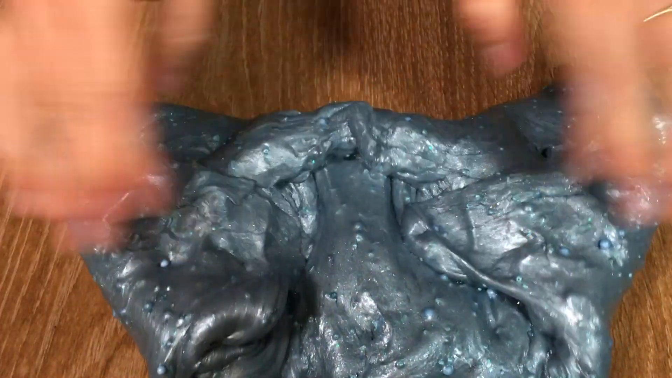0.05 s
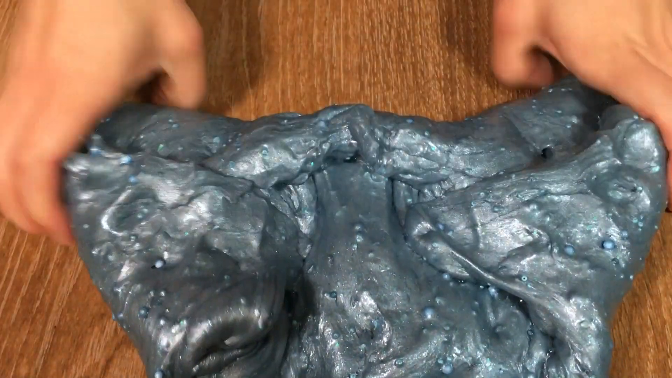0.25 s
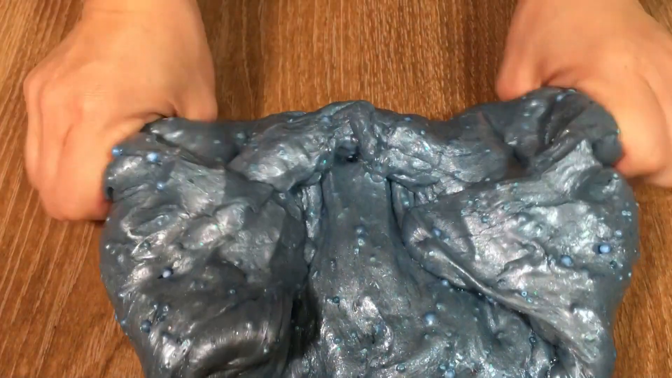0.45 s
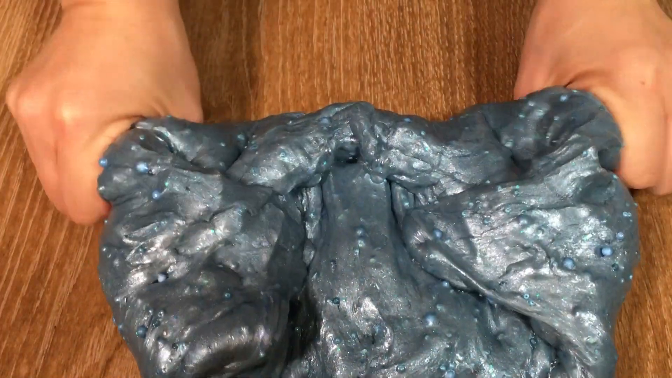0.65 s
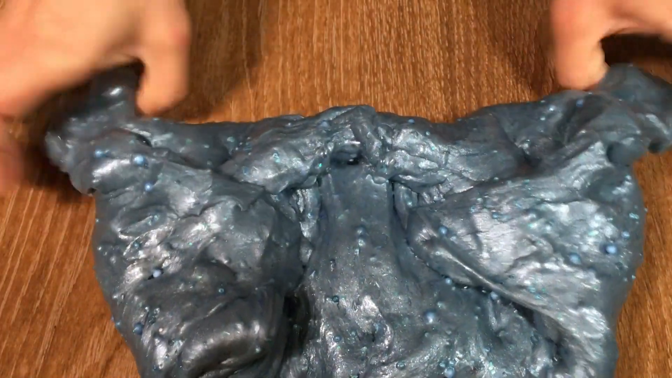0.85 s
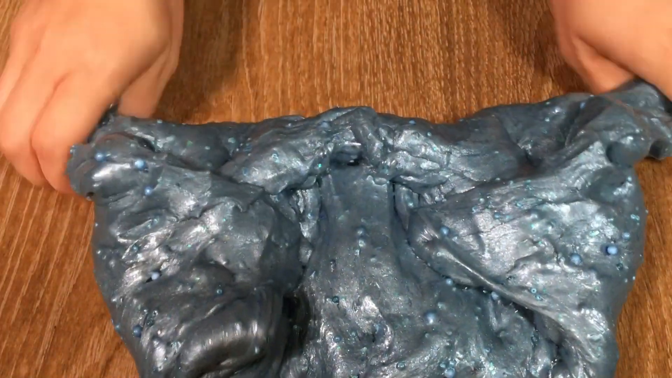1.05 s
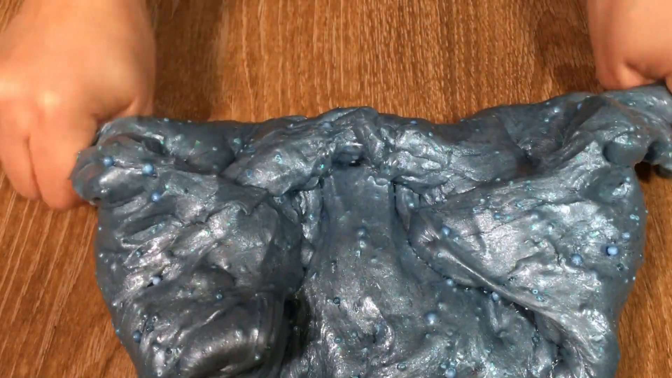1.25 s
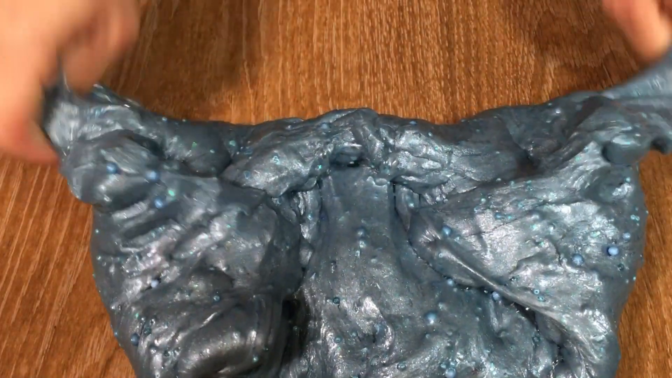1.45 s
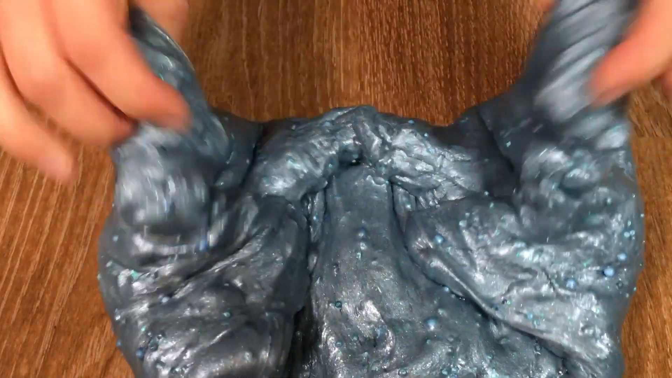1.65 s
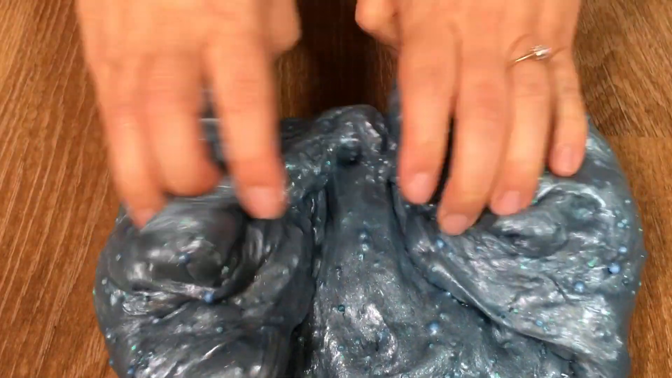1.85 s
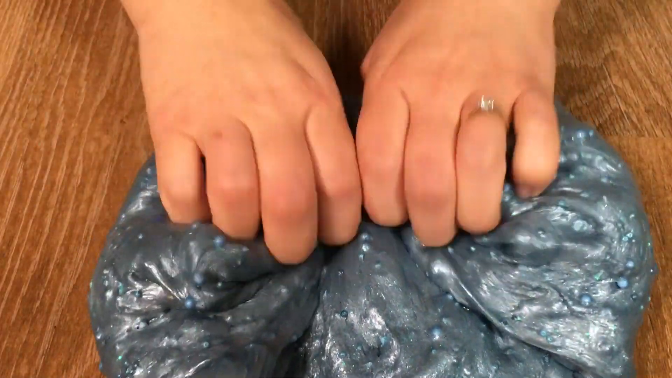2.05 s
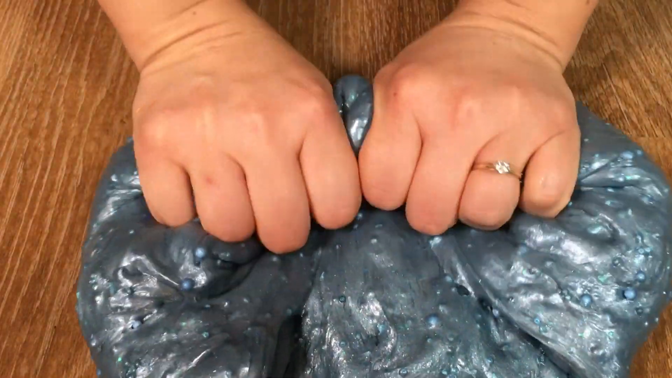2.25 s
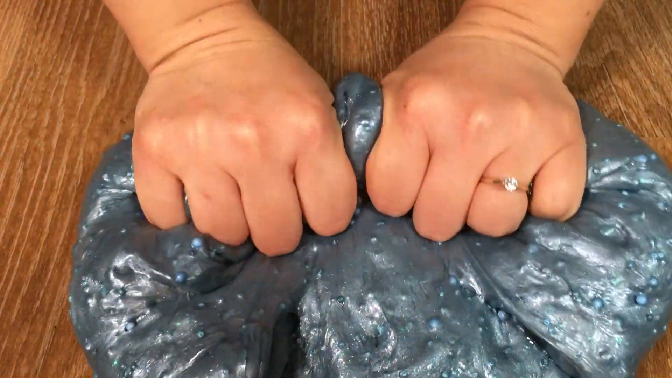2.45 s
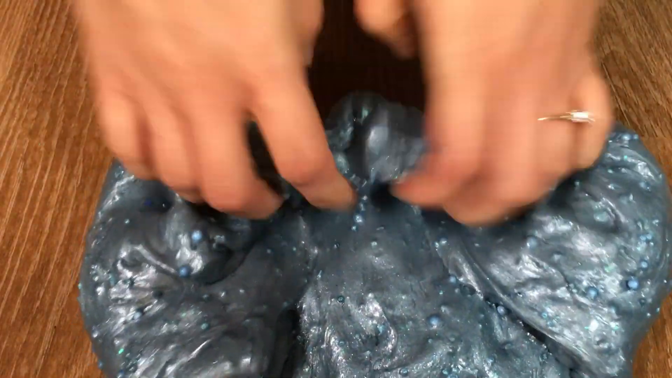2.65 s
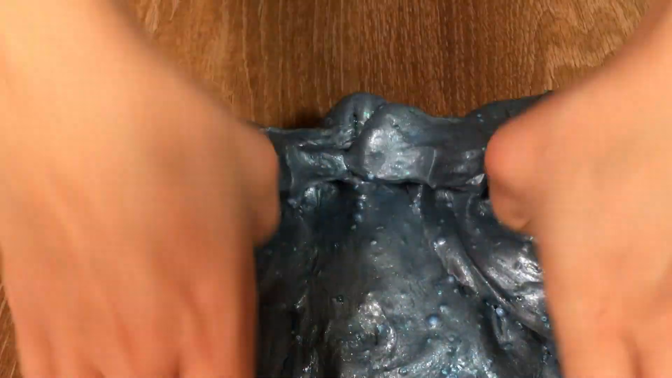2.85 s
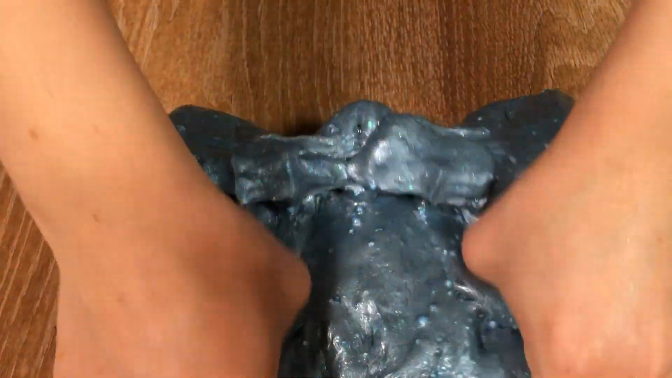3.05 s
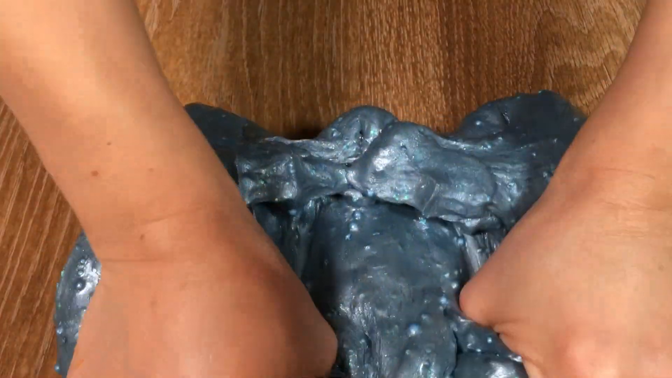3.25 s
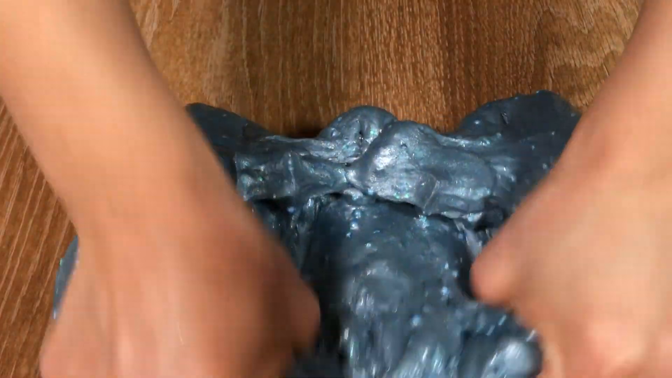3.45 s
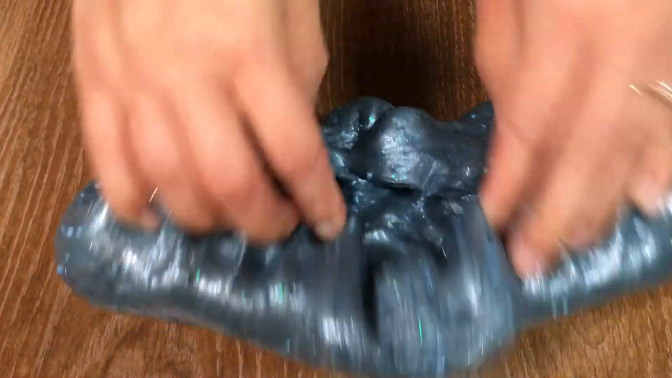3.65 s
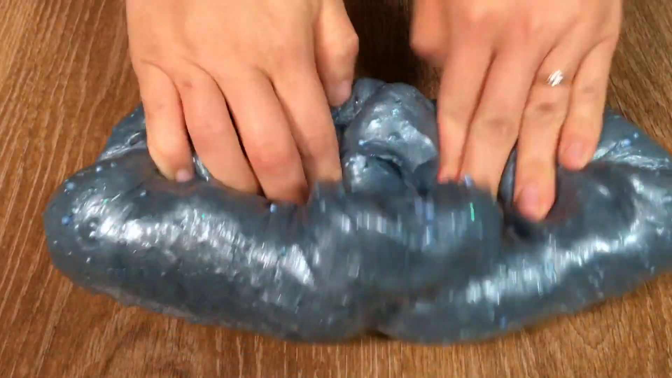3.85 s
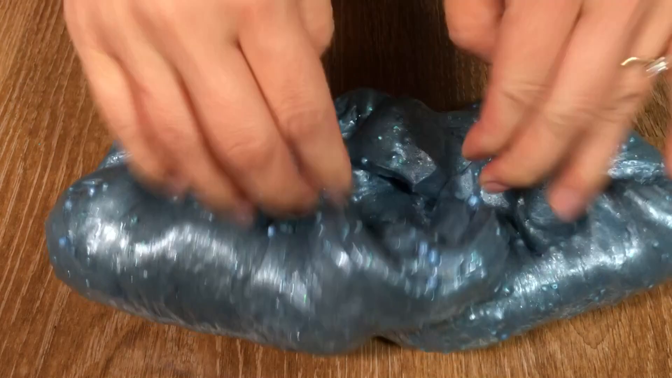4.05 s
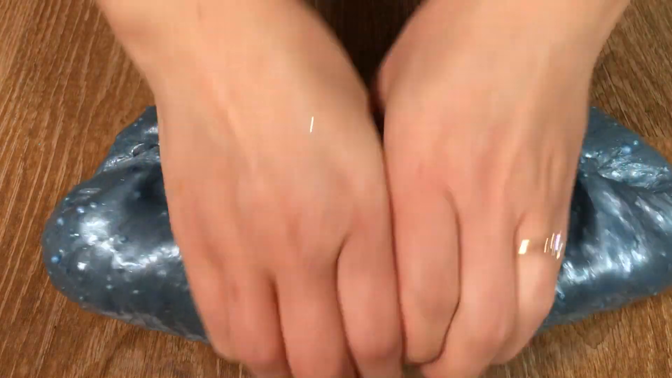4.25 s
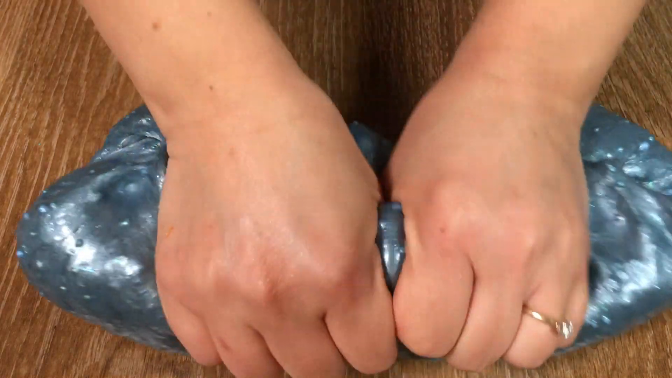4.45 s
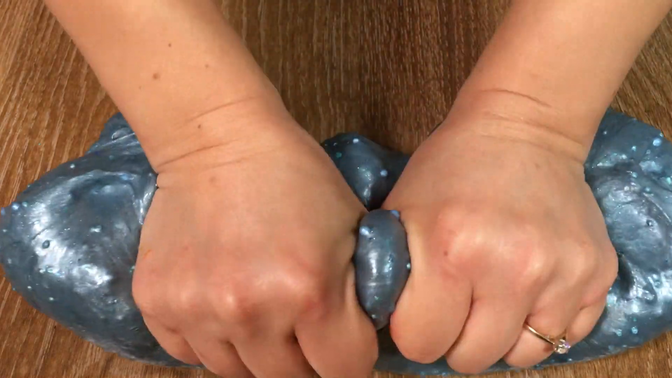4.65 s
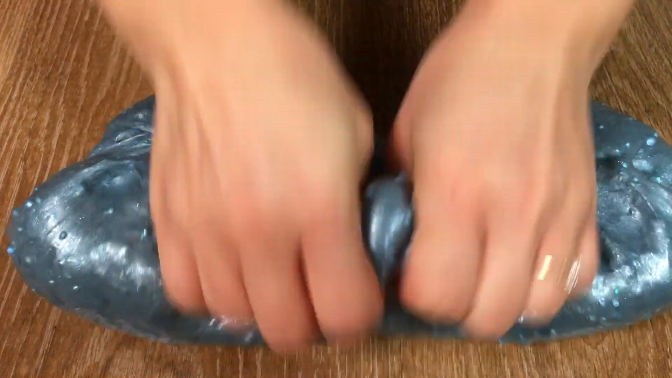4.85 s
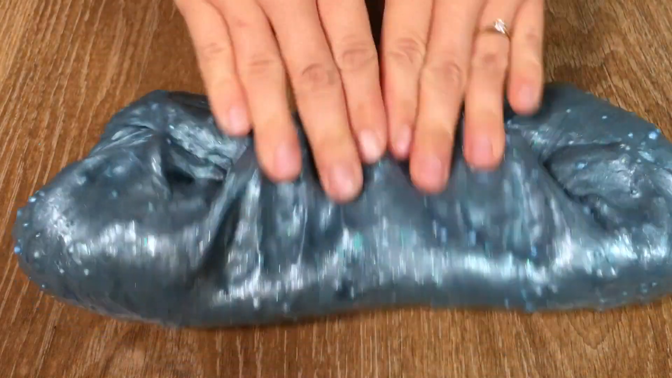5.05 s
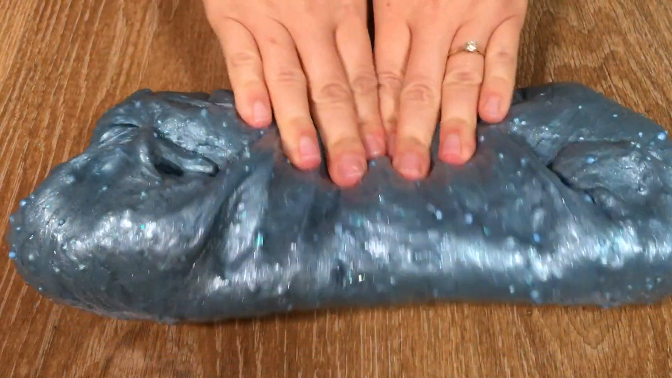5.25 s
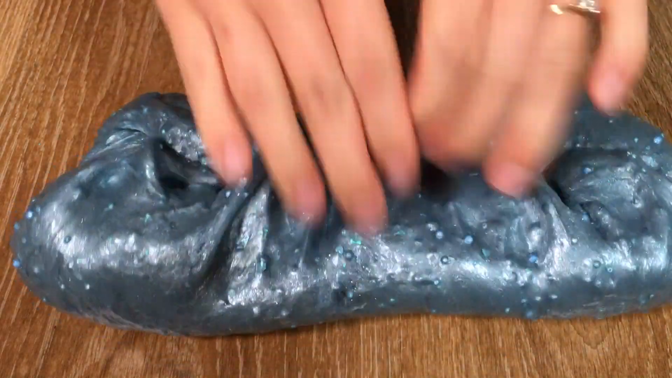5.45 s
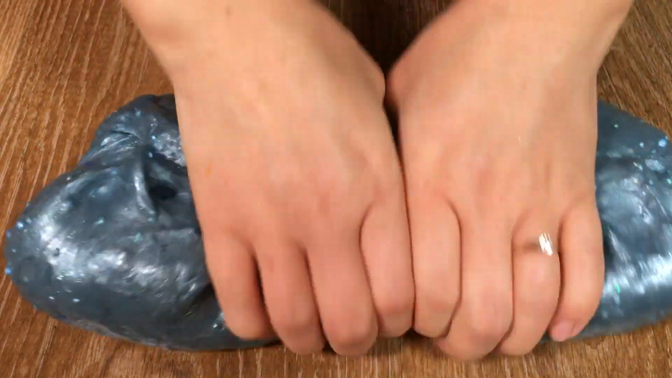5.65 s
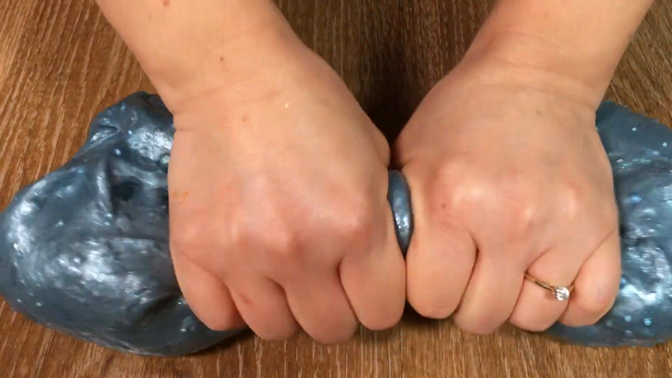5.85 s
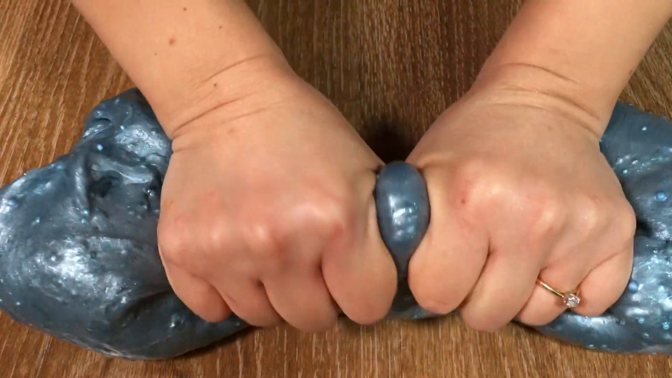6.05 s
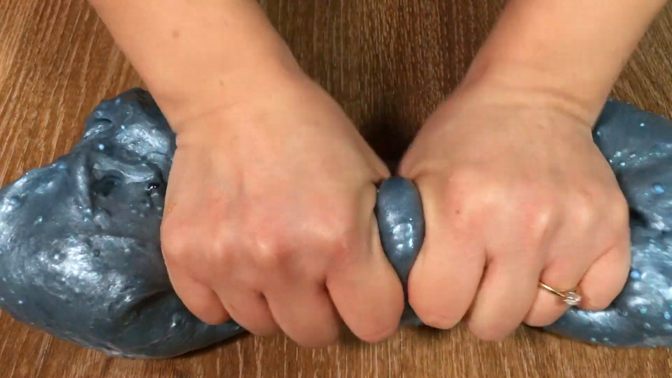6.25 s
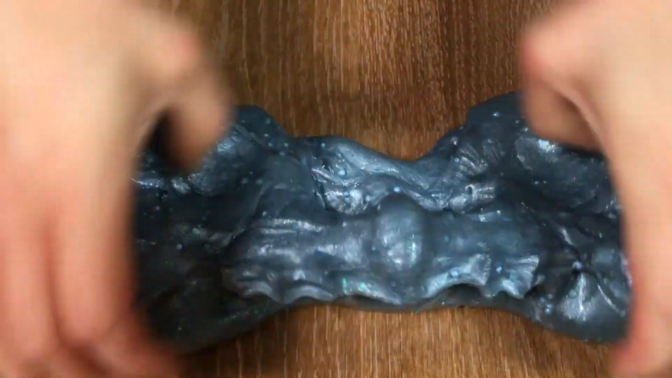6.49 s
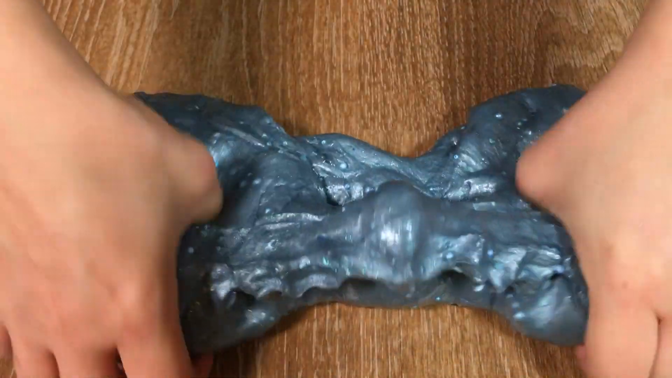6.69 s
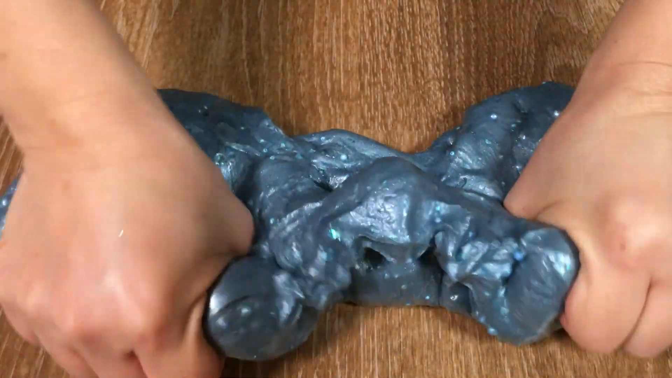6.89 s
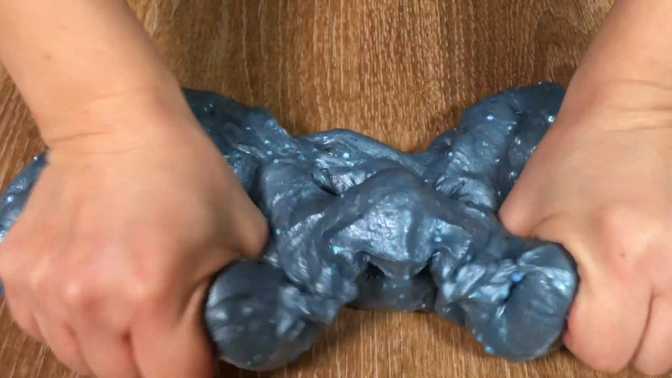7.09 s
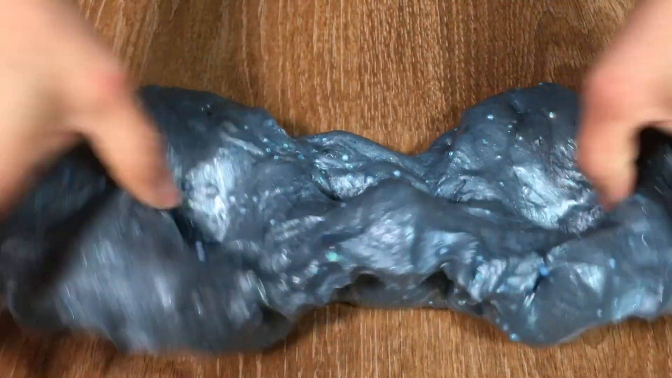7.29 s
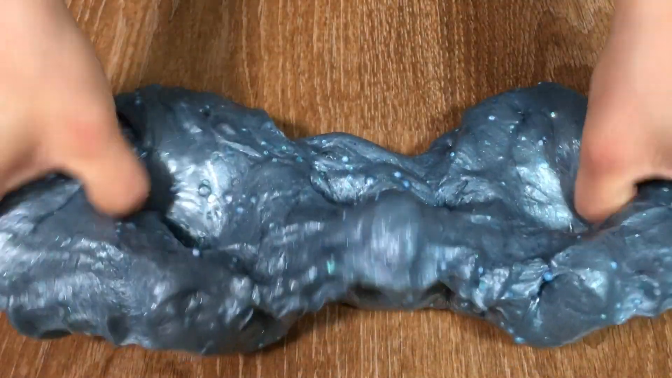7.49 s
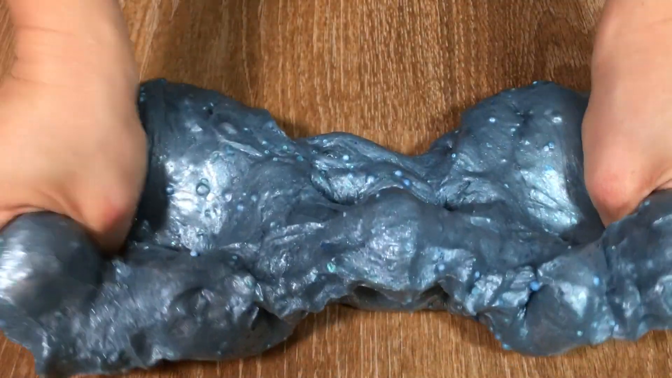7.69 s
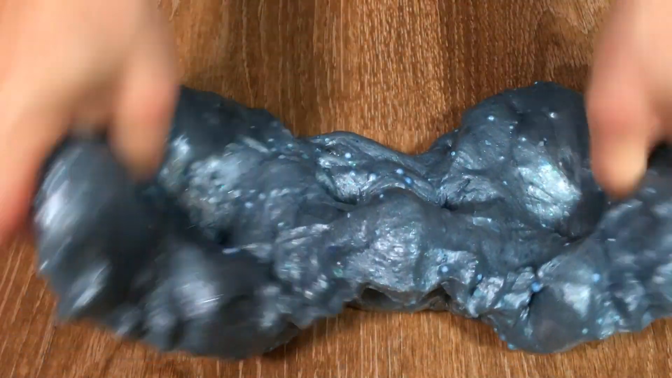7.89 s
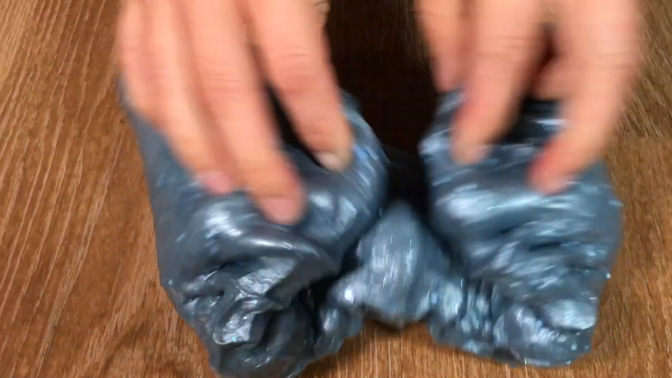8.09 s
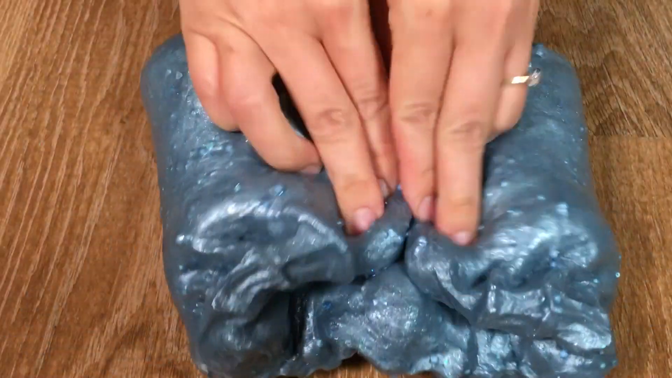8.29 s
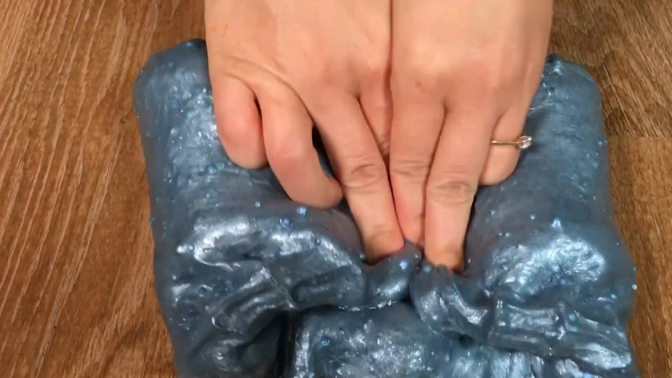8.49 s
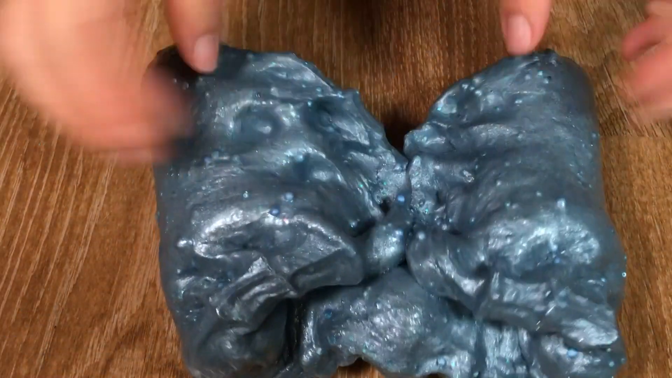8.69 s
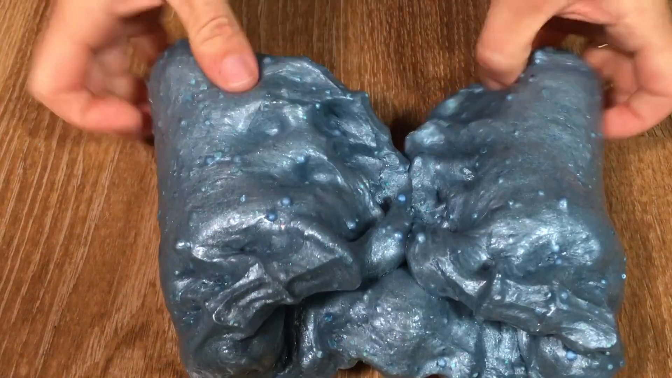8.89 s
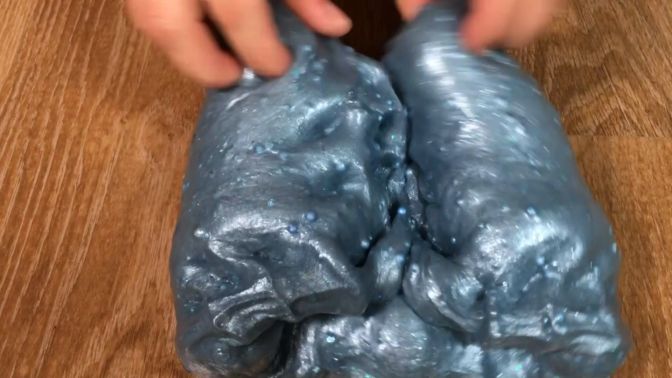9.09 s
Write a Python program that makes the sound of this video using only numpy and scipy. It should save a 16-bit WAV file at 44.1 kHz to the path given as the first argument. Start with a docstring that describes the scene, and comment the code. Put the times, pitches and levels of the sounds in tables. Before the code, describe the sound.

Very close to the microphone, hands stretch and fold thick slime on a wooden table in a quiet furnished room. Short sticky swishes alternate with flurries of sharp bubble pops, fine crackle and soft squelches. Big air pockets bark just after one second and again midway. Later a burst of air hits the microphone with an overloaded bass thump, then the background briefly dips and the handling becomes gentler.

```python
"""Two hands knead a lump of sticky slime on a wooden table, close to a microphone in a quiet room.
Over hum, rumble and hiss, noise bursts swish as the slime peels off, and the lump drags in dull swells.
Soft squelches sag in pitch, resonant pulses pop as small bubbles burst, and random ticks crackle under the squeeze.
After a second, large air pockets bark; late on, one burst blows straight at the microphone:
a diving sine thumps and overloads it, then the background dips for a moment."""
import sys
import numpy as np
from scipy import signal
from scipy.fft import rfft, irfft, next_fast_len
from scipy.io import wavfile
from scipy.ndimage import uniform_filter1d

SR = 44100
rng = np.random.default_rng(int(sys.argv[2]) if len(sys.argv) > 2 else 0)


def waveform_to_disk(signal):
    """Save audio, clipped to [-1, 1], as 16-bit WAV at the path in sys.argv[1]."""
    frames = np.transpose(np.atleast_2d(signal))
    scaled = np.clip(frames, -1, 1) * 32767
    samples = np.round(scaled).astype(np.int16)
    wavfile.write(sys.argv[1], SR, samples)


N = 402633
TIME = np.arange(N) / SR  # s

# A distant appliance hums. Each row: frequency in Hz, rms level in dB ahead of the dip.
HUM = [(49.5, -63), (120, -63), (127, -69.5)]
# Spectrum of room rumble and hiss. Each row: frequency in Hz, relative level in dB.
FLOOR_COLOUR = [(20, -32.5), (44, 0.5), (65, 2), (100, -3.5), (200, 0.5), (320, -11), (700, -16),
                (2000, -23.5), (16000, -33.5)]
# The background dips after the thump. Each row: time in seconds, gain in dB.
FLOOR_DIP = [(6.17, 0), (6.25, -14), (6.55, -13), (7.2, 0)]

# The hands let go and the slime peels off in a quick swish.
# Each row: start in seconds, hold in seconds, level in dB ahead of the body and fizz trims,
# treble in dB relative to that level.
PEELS = [(.022, 0.022, -38, -1), (.79, 0.083, -41.5, -1.5), (1.5, 0.063, -48, 3),
         (1.858, 0.0074, -44.5, -14), (2.66, 0.098, -39, -1), (3.52, 0.12, -39, -1), (4.057, 0.031, -42, 1),
         (4.895, 0.091, -35.5, -4.5), (5.422, 0.029, -45.5, 1.5), (6.39, 0.073, -45, -3),
         (7.23, 0.084, -37, -2), (7.92, 0.09, -39.5, -1.5), (8.637, 0.018, -37.5, -2)]
PEEL_RISE_DB_PER_S, PEEL_FALL_DB_PER_S = 423, 420.5
# The hands press or stretch the lump and it fizzes faintly.
# Each row: start in seconds, hold in seconds, grip in dB (drives the crackle, and the swish after trims),
# treble in dB relative to the grip.
SQUEEZES = [(.56, .06, -39.5, 4), (.98, 0.54, -61, -3.5), (1.62, 0.088, -55, -3.5),
            (1.77, 0.056, -60.5, 12), (2.06, 0.012, -54.5, -10.5), (2.22, 0.065, -47.5, -2),
            (2.34, 0.097, -61.5, -24), (2.59, 0.049, -49.5, 1), (3.03, .14, -55, -3.5),
            (3.26, 0.059, -43, -7), (3.76, 0.033, -55, -2), (4.31, 0.15, -64, -3.5), (4.59, 0.12, -52, -2),
            (5.06, 0.16, -62.5, 2.5), (5.82, 0.051, -56, -5.5), (6, 0.073, -44.5, -1.5),
            (6.88, 0.11, -55, -18), (7.42, 0.46, -57.5, -4), (8.07, 0.036, -53, 6.5), (8.41, .03, -59, -9),
            (9.03, 0.053, -53, -1)]
SQUEEZE_RISE_DB_PER_S, SQUEEZE_FALL_DB_PER_S = 158.5, 149
# Spectrum of the swish's body. Each row: frequency in Hz, relative level in dB.
PEEL_BODY = [(80, -6), (200, -2), (600, -0.5), (900, -0.5), (1400, 2.5), (2200, 0), (3300, -2),
             (4600, -7.5), (7000, -26.5), (16000, -50.5)]
# Spectrum of the swish's treble fizz. Each row: frequency in Hz, relative level in dB.
PEEL_FIZZ = [(500, -42.5), (3000, -13.5), (5000, -3.5), (6500, 2), (9500, 1.5), (10800, -3.5), (13000, -2),
             (16000, -13.5)]

# How long each band of the room rings. Each row: frequency in Hz, time to fall 60 dB in seconds.
ROOM_T60 = [(200, .35), (700, .46), (1800, .43), (5000, .33), (10000, .29), (16000, .19)]
# Spectrum of the reverberation as it starts. Each row: frequency in Hz, relative level in dB.
ROOM_COLOUR = [(100, 1.5), (600, -3), (1600, -3.5), (4500, -3), (9000, 0), (16000, 7.5)]

# The lump shifts on the table as the hands let go.
# Each row: swell centre in seconds, peak level in dB, half length (Gaussian sigma) in seconds.
SHIFTS = [(0.05, -49, 0.02), (2.672, -48, 0.027), (4.087, -41, 0.021), (4.879, -41.5, 0.01),
          (7.262, -49, 0.053), (8.647, -35, 0.012)]
# Spectrum of that drag. Each row: frequency in Hz, relative level in dB.
SHIFT_COLOUR = [(50, -22), (125, -6), (170, 0), (255, -1), (380, -13), (1000, -38)]

# Soft squelches under the fingers.
# Each row: start in seconds, level in dB (rms of the ring at full swell), ring midway through its sag in Hz.
SQUELCHES = [(.274, -44.5, 530), (.302, -41.5, 740), (.325, -42, 550), (.947, -42.5, 540),
             (0.985, -32.5, 512), (2.944, -44.5, 480), (2.975, -42, 715), (3.379, -41.5, 509),
             (4.367, -38.5, 1330), (5.277, -43.5, 571), (5.702, -41.5, 649), (6.143, -29.5, 309),
             (6.391, -34.5, 663), (6.547, -49, 150), (6.62, -49, 341.6), (6.64, -38.5, 543),
             (7.029, -41.5, 720), (7.441, -37.5, 573), (7.81, -43.5, 840), (7.851, -40.5, 887),
             (8.134, -42, 730), (8.288, -43.5, 392), (8.854, -46.5, 620)]
# weaker bubbles trail each squelch: latest delay, relative level, pitch scatter (-0.5 to +1.5 times this)
TRAIL_S, TRAIL_DB, TRAIL_OCTAVES = 0.023, -13, 0.92

# The clearest small bubbles bursting.
# Each row: time in seconds, level in dB over 1 ms ahead of scatter, ring in Hz, sharpness (no unit).
POPS = [(0.4339, -28.5, 3200, 0.93), (0.465, -34, 5000, .3), (0.4875, -28, 14000, 1.8),
        (0.5042, -19.5, 11900, 0.24), (.527, -12.5, 4770, 0.95), (0.5546, -11.5, 3920, 6),
        (0.574, -16, 4180, 0.49), (0.576, -7.5, 5360, 1), (0.5614, -26, 9000, .5),
        (0.598, -18.5, 1960, 0.41), (0.669, -24, 4300, 0.36), (1.214, -26, 7940, 2.3),
        (1.2751, -4.5, 8400, 2), (1.2813, -23, 8970, 1.6), (1.9975, -38.5, 9000, 0.56),
        (2.039, -42, 5000, 0.16), (2.1628, -11, 1570, 0.12), (2.2135, -14, 3870, 1.7),
        (2.2236, -16, 4400, 3), (2.247, -8, 3260, 2.1), (2.3049, -17.5, 5440, 0.64),
        (2.3109, -11, 7300, 0.47), (2.3478, -8, 4300, 0.64), (2.3645, -14.5, 7800, .4),
        (2.3867, -25, 4700, .5), (2.4201, -10.5, 4350, .4), (2.431, -30, 14000, 0.38),
        (2.4388, -6, 3780, 0.25), (2.6581, -22, 2960, .4), (3.1053, -22.5, 2220, 0.56),
        (3.1822, -14.5, 11030, 1.2), (3.241, -11.5, 1904, 0.75), (3.2604, -9, 2500, 0.78),
        (3.3045, -29, 9000, 0.46), (3.4163, -34.5, 3670, 1.5), (3.8777, -45, 5000, .3),
        (4.317, -39, 3470, 0.39), (4.4113, -33, 13080, 0.17), (4.45, -23.5, 5230, 3.4),
        (4.4544, -24, 9050, 0.86), (4.4828, -13.5, 7590, 0.75), (4.5757, -5.5, 7200, 0.55),
        (4.592, -18, 14000, 0.89), (4.606, -18, 4800, 0.22), (4.6269, -13.5, 5160, 3.2),
        (4.638, -17.5, 10700, 1.8), (4.6454, -21.5, 9500, .7), (4.6727, -15, 13900, 0.33),
        (4.6895, -23, 2980, 0.092), (4.994, -29.5, 11850, 0.8), (5.277, -39.5, 6000, 0.25),
        (5.7031, -32, 1650, 1.5), (5.8126, -20, 2816, 0.21), (5.8932, -32.5, 2090, 0.083),
        (5.962, -10, 5100, 0.19), (6.0163, -8, 2235, 0.11), (6.0201, -10, 6800, 3.5),
        (6.0288, -22, 9600, 2), (6.054, -16.5, 12000, 1.1), (6.062, -18, 6460, 0.067),
        (6.0662, -20, 13900, 1.5), (6.1084, -27.5, 6600, .2), (6.139, -25.5, 3500, .2),
        (6.1665, -5, 1345, 0.26), (6.782, -33.5, 4390, 4.2), (6.852, -32.5, 3430, 0.54),
        (6.8816, -22.5, 12900, 2.6), (6.9003, -35.5, 2500, 1.1), (6.923, -35.5, 4650, 0.22),
        (7.0048, -18, 12000, 0.97), (7.0328, -29.5, 14000, 0.46), (7.464, -34, 14000, 1.8),
        (7.5329, -30.5, 4640, 3.7), (7.673, -41, 3030, 0.21), (7.51, -45, 3020, 0.51),
        (7.691, -34, 2500, 0.45), (7.7288, -32, 4300, 0.34), (7.7404, -21, 8250, 0.22),
        (8.31, -39, 3500, 0.25), (8.4166, -28.5, 5350, 0.098), (8.4353, -36.5, 3900, .2),
        (9.0636, -38.5, 10200, .2)]
# Spectrum shared by all small pops. Each row: frequency in Hz, relative level in dB.
POP_COLOUR = [(60, -6.5), (200, 6), (700, 6.5), (2200, 2), (3500, 0.5), (4900, -1), (6500, 3), (9500, 4),
              (11000, 2), (16000, -6)]
LEAD_S = 1 / 1000  # room for a pulse to swell in before its peak
# a ringing cavity sounds in all directions, a bare snap does not; the loudest pops face the mic and are drier
RING_ROOM_DB_PER_DOUBLING, FACING_SHARE, TYPICAL_POP_DB = 2, .3, -16
# a burst sets off weaker neighbours: within how long, how much weaker at once, how fast they fade
CHAIN_S, CHAIN_DB, CHAIN_FADE_DB_PER_S = .05, -17, 298.5

# Large air pockets giving way.
# Each row: time in seconds, level in dB over 1 ms ahead of scatter, ring in Hz, -3 dB width in Hz,
# crack in dB relative to the bark ahead of its filters, extra room send in dB.
POCKETS = [(1.225, -2, 1990, 1650, -22, -9.5), (1.227, -0.5, 1840, 1642, -15, 6.5),
           (4.4734, 3.5, 1910, 1490, -8, -7)]
EDGE_HZ = 16300  # top of the recorded band


def amp(db):
    """Decibels to gain."""
    return 10 ** (np.asarray(db) / 20)


def unit(x):
    """Scales to rms 1."""
    return x / np.sqrt(np.mean(x ** 2) + 1e-20)


def read(points, hz):
    """Reads a table of values against frequency, on a log-frequency axis."""
    f, value = np.transpose(points)
    return np.interp(np.log(hz + 1), np.log(f + 1), value)


def add(mix, s, sound):
    """Mixes a sound in at time s."""
    part = mix[max(round(s * SR), 0):][:len(sound)]
    part += sound[:len(part)]


def colour(x, points):
    """Gives a sound a spectrum, at rms 1."""
    size = next_fast_len(len(x))
    gain = amp(read(points, np.fft.rfftfreq(size, 1 / SR)))
    return unit(irfft(rfft(x, size) * gain, size)[:len(x)])


def floor(floor_db=-62.0):
    """A hum in low rumble and faint hiss, dipping together after the thump."""
    hum = sum(amp(db) * np.sqrt(2) * np.sin(2 * np.pi * (hz * TIME + rng.random())) for hz, db in HUM)
    rumble_and_hiss = amp(floor_db) * colour(rng.standard_normal(N), FLOOR_COLOUR)
    dip = amp(np.interp(TIME, *np.transpose(FLOOR_DIP)))
    return dip * (hum + rumble_and_hiss)


def strokes(rows, rise_db_per_s, fall_db_per_s, size=64):
    """Each hand stroke swells, holds and dies away; returns the gains of body and treble."""
    t, body_power, treble_power = TIME[::size], 0, 0
    for s, hold_s, db, treble_db in rows:
        rise_db = rise_db_per_s * np.maximum(s - t, 0)
        fall_db = fall_db_per_s * np.maximum(t - s - hold_s, 0)
        gain = amp(db - rise_db - fall_db)
        body_power = body_power + gain ** 2
        treble_power = treble_power + (gain * amp(treble_db)) ** 2
    return np.sqrt([np.interp(TIME, t, body_power), np.interp(TIME, t, treble_power)])


def threads(per_s, spread_db):
    """A random train of sticky threads letting go, a few stronger than the rest."""
    strength = amp(spread_db * np.minimum(rng.exponential(1, N), 4))
    return strength * rng.choice([-1, 1], N) * (rng.random(N) < per_s / SR)


def patchy(x, depth_db, size=512):
    """The shifting folds lift and hide narrow bands for moments at a time."""
    z = signal.stft(x, nperseg=size)[2]
    across_bands = uniform_filter1d(rng.standard_normal(z.shape), size=5, axis=0)
    patches = unit(uniform_filter1d(across_bands, size=7, axis=1))  # smoothed over time as well
    return unit(signal.istft(z * amp(depth_db * patches), nperseg=size)[1][:N])


def peeling(pull, treble, body_db=-3.0, fizz_db=-2.5):
    """Thousands of threads a second merge into a swish; body and treble follow separate stroke gains."""
    train = threads(per_s=11000, spread_db=2.5)
    body = patchy(colour(train, PEEL_BODY), depth_db=1.8)
    fizz = patchy(colour(train, PEEL_FIZZ), depth_db=2.5)
    return amp(body_db) * pull * body + amp(fizz_db) * treble * fizz


def room(x, delay_s=0.0013, size=256):
    """A small furnished room: dense reflections, each band dying at its own speed."""
    taps = rng.standard_normal(SR // 2) * (rng.random(SR // 2) < .2)
    hz, t, z = signal.stft(taps, SR, nperseg=size)
    fade_db = read(ROOM_COLOUR, hz)[:, None] - 60 * t / read(ROOM_T60, hz)[:, None]
    tail = signal.istft(z * amp(fade_db), SR, nperseg=size)[1]
    tail *= np.minimum(np.arange(len(tail)) / SR / delay_s, 1)  # reflections build up from nothing
    return signal.fftconvolve(x, tail / np.linalg.norm(tail))[:N]


def shifts():
    """The heavy lump drags on the wood in short, dull swells of noise."""
    swell = sum(amp(db) * np.exp(-((TIME - s) / half_s) ** 2 / 2) for s, db, half_s in SHIFTS)
    return swell * colour(rng.standard_normal(N), SHIFT_COLOUR)


def bubbles(count=4):
    """Every squelch and the weaker bubbles that trail it: (s, level dB, ring Hz)."""
    for (s, db, ring_hz), trail in zip(SQUELCHES, rng.random((len(SQUELCHES), count, 2))):
        yield s, db, ring_hz
        for late, detune in trail:
            octaves = TRAIL_OCTAVES * (2 * detune - .5)
            yield s + TRAIL_S * late, db + TRAIL_DB, ring_hz * 2 ** octaves


def squelches(size=2048, swell_s=0.00085, sag=0.088, sag_s=0.0044):
    """Air slips through a soft fold: a few cycles that sag in pitch, with a wet tick."""
    out, t = np.zeros(N), np.arange(size) / SR
    swell = t / swell_s * np.exp(1 - t / swell_s)  # peaks at 1
    for s, db, ring_hz in bubbles():
        turns = np.cumsum(ring_hz * (1 + sag * np.exp(-t / sag_s) - sag / 2)) / SR
        ring = swell * np.sqrt(2) * np.sin(2 * np.pi * turns)
        wet_noise = colour(rng.standard_normal(size), [(200, 0.5), (1800, -1.5), (9000, -25.5)])  # (Hz, dB)
        tick = wet_noise * np.exp(-t / swell_s)
        add(out, s, amp(db) * (ring + tick))
    return out


def click(gain, lag=1):
    """A pulse with this magnitude spectrum and the energy of 1 ms at rms 1; lag 1 starts at once, less swells in."""
    log_gain = np.log(np.maximum(np.r_[gain, gain[-2:0:-1]], 1e-5))
    phase = -lag * signal.hilbert(log_gain).imag  # lag 1 is minimum phase
    pulse = np.fft.ifft(np.exp(log_gain + 1j * phase)).real
    return np.roll(pulse, round(LEAD_S * SR)) * np.sqrt(SR / 1000) / np.linalg.norm(pulse)


def scatter(size=2048, near_db=-9, near_s=0.0024, echo_s=0.0012, echo_db=-17):
    """A direct path, a quick scatter between fingers and folds, and one bounce off the table."""
    t = np.arange(size) / SR
    paths = rng.standard_normal(size) * np.exp(-t / near_s)
    paths *= amp(near_db) / np.linalg.norm(paths)
    paths[0] = 1
    bounce = round(echo_s * SR * rng.uniform(.8, 1.2))
    paths[min(bounce, size - 1)] += amp(echo_db)
    return paths


def lead_noise(size, lead_db=-20, lead_s=0.00038):
    """A faint spiky noise swells just ahead of each pop."""
    before_s = np.arange(size)[::-1] / SR
    noise = rng.standard_normal(size) ** 3 * np.exp(-before_s / lead_s)
    return amp(lead_db) * noise / np.linalg.norm(noise)


def spill(db, q):
    """Gain of a pop's share of the room, from its level and its sharpness."""
    return amp(RING_ROOM_DB_PER_DOUBLING * np.log2(q) - FACING_SHARE * (db - TYPICAL_POP_DB))


def pops(size=1024, skirt_db=-20, count=2):
    """Each small bubble bursts and its cavity rings briefly; returns direct sound and room feed."""
    direct, feed, hz = np.zeros(N), np.zeros(N), np.fft.rfftfreq(size, 1 / SR) + 1
    for (s, db, ring_hz, q), neighbours in zip(POPS, rng.random((len(POPS), count))):
        resonance = 1 / (1 + (q * (hz / ring_hz - ring_hz / hz)) ** 2)
        cavity = resonance + amp(skirt_db)
        snap = click(cavity * amp(read(POP_COLOUR, hz)), lag=0.5)
        pop = amp(db) * signal.fftconvolve(snap, scatter())
        add(direct, s - LEAD_S, pop)
        add(feed, s - LEAD_S, pop * spill(db, q))
        lead = amp(db) * signal.fftconvolve(snap, lead_noise(size))
        add(direct, s - LEAD_S - size / SR, lead)
        for late_s in CHAIN_S * neighbours:
            add(direct, s + late_s, amp(db + CHAIN_DB - CHAIN_FADE_DB_PER_S * late_s) * snap)
    return direct, feed


def crackle(squeeze, crackle_db=-57, growth=0.69):
    """Pinhead bubbles of several sizes tick whenever the slime is squeezed, louder under a harder grip."""
    busy_db = -58  # grip at which the crackle reaches crackle_db
    out, hz = np.zeros(N), np.fft.rfftfreq(512, 1 / SR) + 1
    for ring_hz in np.geomspace(1400, 12000, 9):
        cavity = 1 / (1 + (hz / ring_hz - ring_hz / hz) ** 2)
        tick = signal.fftconvolve(click(cavity, lag=0.27), scatter())
        out += unit(signal.oaconvolve(threads(per_s=11, spread_db=4), tick)[:N])
    return unit(out) * amp(crackle_db) * (squeeze / amp(busy_db)) ** growth


def pockets(size=2048, crack_hz=6500, thud_db=-14, thud_hz=180, thud_width_hz=110):
    """A large pocket barks in one steep band, with a thin crack above it and a thud of the lump below."""
    direct, feed, hz = np.zeros(N), np.zeros(N), np.fft.rfftfreq(size, 1 / SR)
    for s, db, ring_hz, width_hz, crack_db, room_db in POCKETS:
        cavity = 1 / np.sqrt(1 + (2 * (hz - ring_hz) / width_hz) ** 8)
        thud = amp(thud_db) / (1 + (2 * (hz - thud_hz) / thud_width_hz) ** 2)
        crack = amp(crack_db) * hz / (hz + ring_hz) / np.hypot(1, (hz / crack_hz) ** 3)
        pop = amp(db) * click(cavity + thud + crack, lag=.8)
        add(direct, s - LEAD_S, signal.fftconvolve(pop, scatter(near_db=-13.5, near_s=0.0038)))
        add(feed, s - LEAD_S, pop * amp(room_db))
    return direct, feed


def puff(puff_db=3.0, lead_db=-11, size=16384):
    """A jet of air strikes the microphone: a slow push, a swing diving into deep bass, then a slow settling."""
    s, start_hz, end_hz, lead_s = 6.1672, 440, 44, 1 / 52
    rise_s, fall_s, last_s, settle_s, settle_db = .0018, .0028, .0225, .06, -34
    out, t = np.zeros(N), np.arange(size) / SR
    turns = np.cumsum(end_hz + (start_hz - end_hz) * np.exp(-t / fall_s)) / SR
    swing = amp(puff_db) * np.sin(2 * np.pi * turns) * np.exp(-(t / last_s) ** 2)
    settling = amp(settle_db) * np.exp(-t / settle_s)
    add(out, s, (swing + settling) * (1 - np.exp(-t / rise_s)))
    push = np.linspace(0, 1, round(SR * lead_s))  # one cycle, growing and speeding up
    add(out, s - lead_s, amp(lead_db) * push * np.sin(2 * np.pi * push ** 2))
    return out


def scene(pop_room_db=-14.5, pocket_room_db=-5, squelch_room_db=-3.5, tick_room_db=-10,
          peel_room_db=-14, squeeze_fizz_db=-2):
    """All the slime's sounds, their reverberation and the quiet room."""
    peel = strokes(PEELS, PEEL_RISE_DB_PER_S, PEEL_FALL_DB_PER_S)
    squeeze = strokes(SQUEEZES, SQUEEZE_RISE_DB_PER_S, SQUEEZE_FALL_DB_PER_S)
    pull, treble = np.hypot(peel, amp(squeeze_fizz_db) * squeeze)
    swish = peeling(pull, treble)
    soft = squelches()
    small, small_feed = pops()
    ticks = crackle(squeeze[0])
    large, large_feed = pockets()
    wet = room(amp(pop_room_db) * small_feed + amp(pocket_room_db) * large_feed
               + amp(squelch_room_db) * soft + amp(tick_room_db) * ticks + amp(peel_room_db) * swish)
    return (small + large + soft + ticks + swish + wet + shifts() + puff() + floor())[None]


def record(dry):
    """The overloaded microphone bends peaks above half scale towards full scale; then the band limit."""
    knee = .5
    over = np.maximum(abs(dry) - knee, 0)
    rounded = np.sign(dry) * (abs(dry) - over + (1 - knee) * np.tanh(over / (1 - knee)))
    low_pass = signal.firwin(201, EDGE_HZ, window=("kaiser", 9), fs=SR)
    return signal.oaconvolve(rounded, low_pass[None], "same")


dry = scene()
out = record(dry)
waveform_to_disk(out)
```